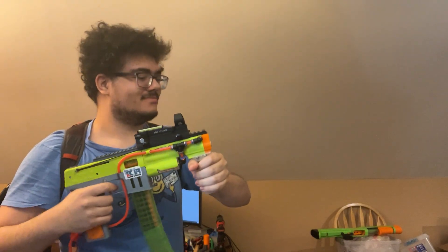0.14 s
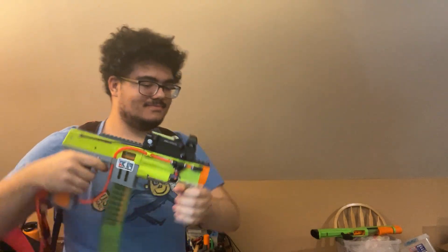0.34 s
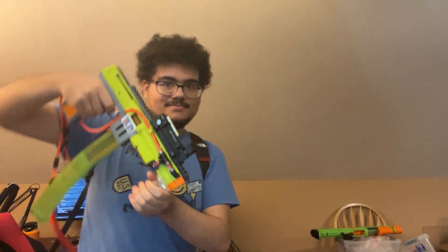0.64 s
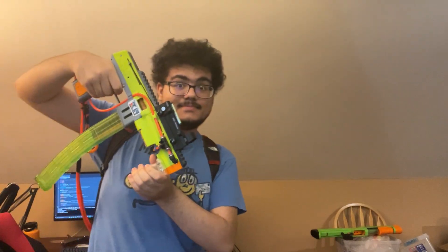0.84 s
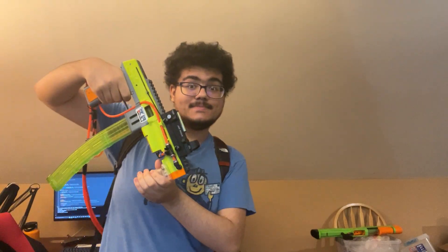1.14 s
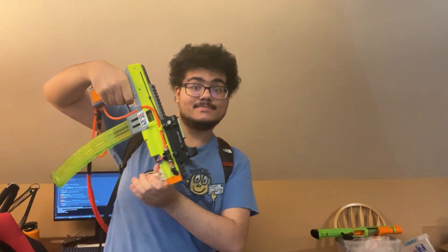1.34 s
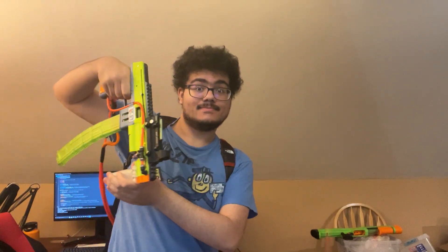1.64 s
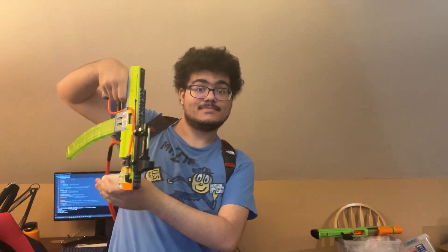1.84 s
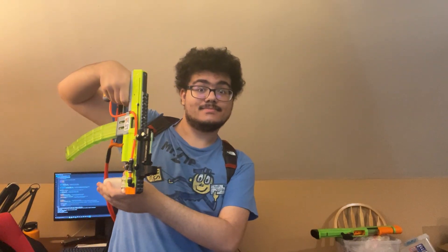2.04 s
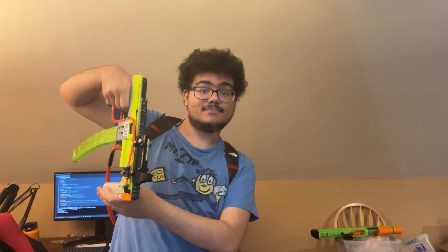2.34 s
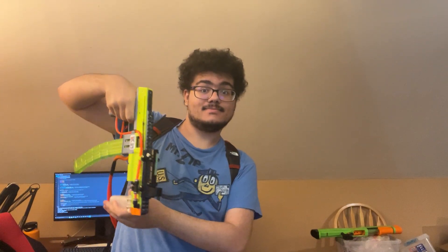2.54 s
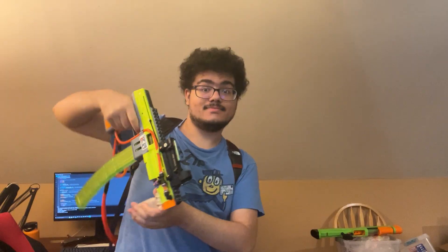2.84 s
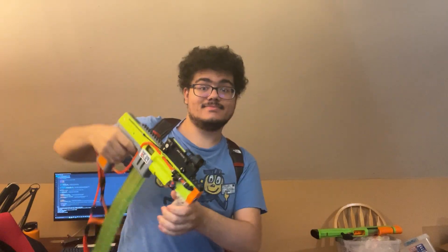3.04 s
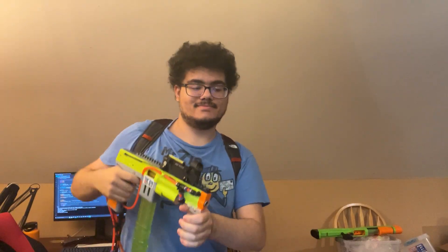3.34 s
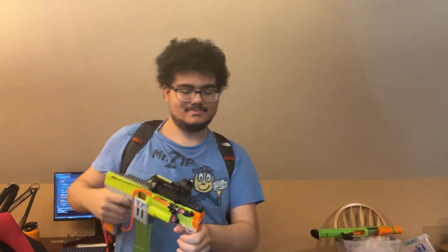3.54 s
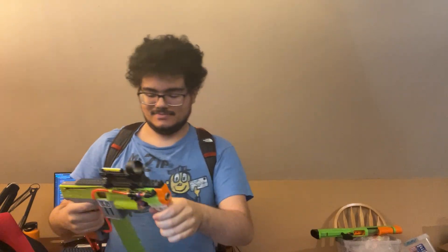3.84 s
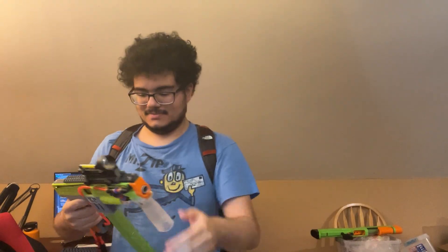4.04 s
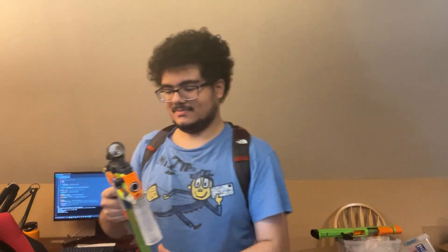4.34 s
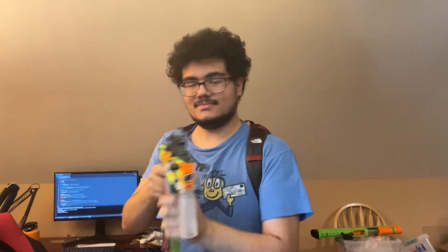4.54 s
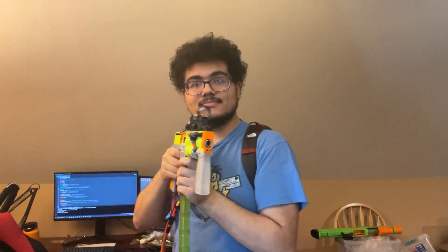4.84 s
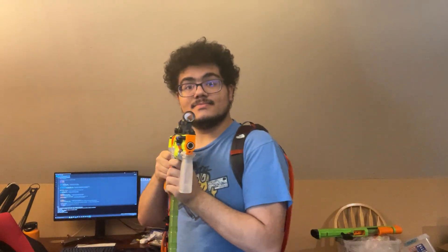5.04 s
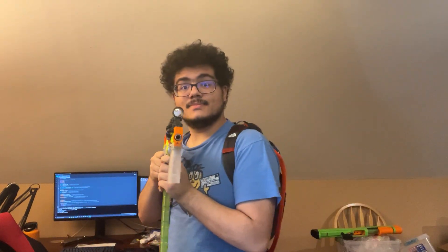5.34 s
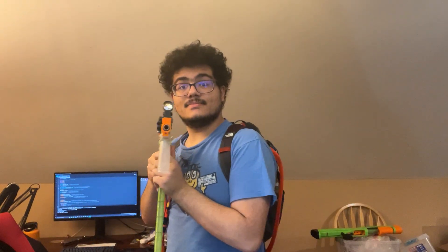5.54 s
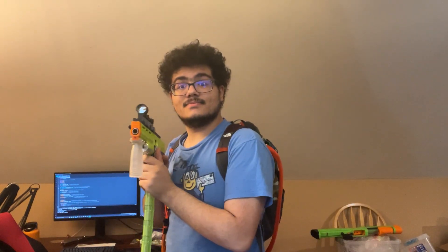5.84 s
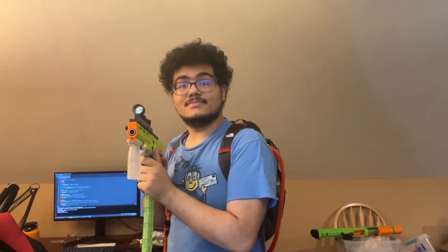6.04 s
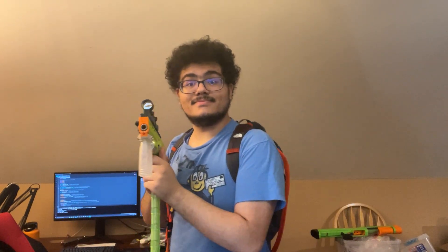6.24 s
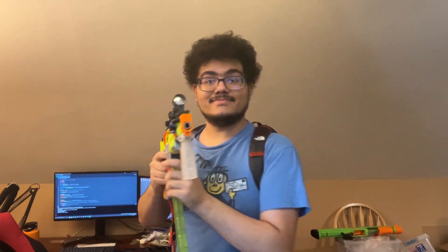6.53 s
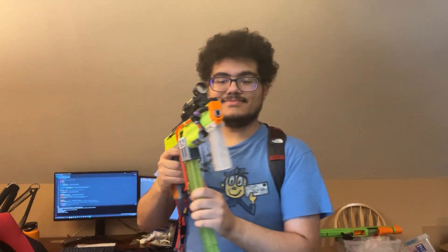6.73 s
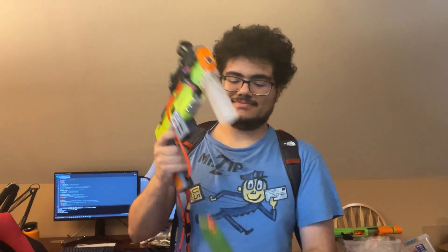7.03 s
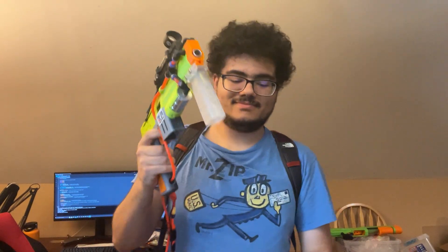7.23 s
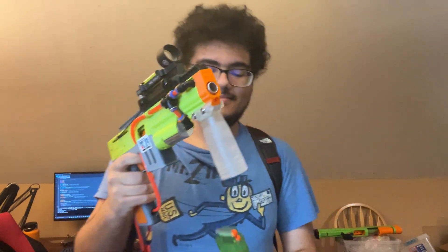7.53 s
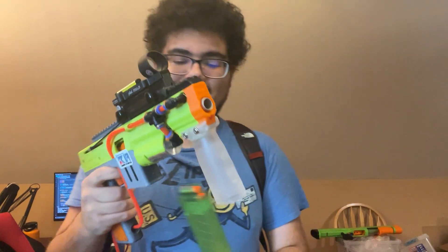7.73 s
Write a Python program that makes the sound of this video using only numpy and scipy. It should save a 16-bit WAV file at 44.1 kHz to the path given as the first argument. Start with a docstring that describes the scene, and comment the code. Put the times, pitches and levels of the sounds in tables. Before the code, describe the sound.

Indoors, a compressed-air dart blaster pops four times a second in two bursts, darts smacking objects, followed by a magazine scraping and clicking free.

```python
"""A compressed-air dart blaster fires bursts of ten and six, four shots a second: side-on, then facing the microphone.
Each shot is a bolt kick, an air jet, a pop with barrel ring and boom; then venting, bolt snap, valve knock and air feed.
Darts strike things as shaped noise and pulses; one struck object rings on as dying sines over a noise wash.
Around the bursts the plastic shell is handled: knocks, creaks, rattle, cloth rustle and a sliding magazine.
All of it passes through a small room with near echoes, over a faint hum and a rush of noise."""
import sys
import numpy as np
from scipy import signal
from scipy.fft import rfft, irfft, next_fast_len
from scipy.io import wavfile
from scipy.ndimage import uniform_filter1d

SR = 44100
rng = np.random.default_rng(int(sys.argv[2]) if len(sys.argv) > 2 else 0)


def store_pcm(level_fs):
    """Save levels as 16-bit WAV."""
    pcm = np.round(np.clip(level_fs, -1, 1) * 32767).astype(np.int16)
    wavfile.write(sys.argv[1], SR, np.atleast_2d(pcm).T)


N = 347508


def amp(db):
    """Decibels to linear amplitude."""
    return 10 ** (np.asarray(db) / 20)


def evened(x):
    """Scale to unit RMS."""
    return x / np.sqrt(np.mean(x ** 2) + 1e-20)


def seconds(length_s):
    """Time axis in seconds."""
    return np.arange(int(length_s * SR)) / SR


def read(table, hz, index=1):
    """Interpolate one table column along a log-frequency axis."""
    columns = np.transpose(table)
    return np.interp(np.log(hz + 1), np.log(columns[0] + 1), columns[index])


def level_at(table, time_s):
    """Interpolate a (time, level) table in dB."""
    return np.interp(time_s, *np.transpose(table))


def add(mix, start_s, sound):
    """Mix a sound in at a start time, cut at the end of the mix."""
    part = mix[max(round(start_s * SR), 0):][:len(sound)]
    part += sound[:len(part)]


def slow_noise(shape, width):
    """Unit-RMS noise smoothed twice into a slow wander."""
    once = uniform_filter1d(rng.standard_normal(shape), size=width)
    return evened(uniform_filter1d(once, size=width))


def click(table, index=1, dull_hz=1e6, size=4096):
    """Minimum-phase pulse of unit energy with the given colour, rolled off above dull_hz."""
    hz = abs(np.fft.fftfreq(size, 1 / SR))
    gain = amp(read(table, hz, index)) / np.sqrt(1 + (hz / dull_hz) ** 6)
    spectrum = np.exp(signal.hilbert(np.log(gain + 1e-5)).conj())
    pulse = np.fft.ifft(spectrum).real[:size // 2]
    return pulse / np.linalg.norm(pulse)


def push(pulse):
    """Single pressure pulse with the energy of 2 ms at full level."""
    return pulse * np.sqrt(.002 * SR)


def puff(pulse, rise_s, hold_s, fall_s):
    """Turbulent air: noise that swells, holds and dies, coloured by a pulse."""
    t = seconds(rise_s + hold_s + 10 * fall_s)
    shape = np.minimum(t / rise_s, 1) * np.exp(-np.maximum(t - rise_s - hold_s, 0) / fall_s)
    return signal.fftconvolve(shape * rng.standard_normal(len(t)), pulse)


def ring(modes, length_s, rise_s):
    """Resonant modes: exponentially dying sines under a shared onset."""
    t = seconds(length_s)
    sines = sum(amp(db - 60 * t / t60_s) * np.sin(2 * np.pi * hz * t) for hz, db, t60_s in modes)
    return sines * (1 - np.exp(-t / rise_s))


def scattered(start_s, end_s, per_s):
    """One random moment in each equal slot between two times."""
    slots = np.arange(start_s, end_s, 1 / per_s)
    return slots + rng.random(len(slots)) / per_s


# rush of the room: (frequency [Hz], level [dB])
FLOOR_COLOUR = [(20, -8.5), (60, 2.5), (130, -1), (250, -7), (600, -12.5), (1500, -22), (5000, -28),
                (16000, -29)]
HUM_HZ = 119.3


def background(hum_db=-72.5, floor_db=-76, waver_db=5.5):
    """A hum wavering in level and phase over coloured, partly shared stereo noise."""
    waver = slow_noise((2, N), 3000)
    turns = HUM_HZ * np.arange(N) / SR + .06 * waver[1]
    hum = amp(hum_db + waver_db * waver[0]) * np.sqrt(2) * np.sin(2 * np.pi * turns)
    air = signal.fftconvolve(rng.standard_normal((2, N)), click(FLOOR_COLOUR)[None], axes=1)[:, :N]
    return hum + amp(floor_db) * evened(air + .5 * air[::-1])


# sleeves and straps as the blaster moves: (time [s], level [dB])
RUSTLE_LEVEL = [(0, -67.5), (.3, -63), (.7, -67), (3.5, -63), (4.3, -71.5), (4.55, -70), (6.7, -81),
                (7.25, -91.5), (7.88, -91.5)]
# cloth friction: (frequency [Hz], level [dB])
CLOTH_COLOUR = [(40, -11.5), (150, 4), (480, 3), (700, -5.5), (1100, -14.5), (2500, -20), (16000, -26)]


def rustle(uneven_db=1.5):
    """Cloth friction: coloured noise with an uneven level."""
    level_db = level_at(RUSTLE_LEVEL, np.arange(N) / SR) + uneven_db * slow_noise(N, 1200)
    return signal.fftconvolve(amp(level_db) * rng.standard_normal(N), click(CLOTH_COLOUR))[:N]


# blaster swung round: (start [s], end [s], level [dB])
SWINGS = [(.52, .66, -61), (4.6, 4.98, -53.5)]
# air jet, also colours the ticks: (frequency [Hz], side-on level [dB], facing level [dB])
JET_COLOUR = [(100, -19.5, -24), (600, -8, 0.5), (2000, -2, 1.5), (4000, -2, -0.5), (7000, 0.5, 2),
              (11090, -4, -1), (16250, -5.5, -3.5)]
TICKS_PER_S = 30


def rattle(spread_db=3.0, fall_s=.0012):
    """Loose darts tick in the magazine: short noise bursts at scattered moments and levels."""
    out = np.zeros(N)
    for start_s, end_s, db in SWINGS:
        for tick_s in scattered(start_s, end_s, TICKS_PER_S):
            gain = amp(db + spread_db * rng.standard_normal())
            add(out, tick_s, gain * puff(click(JET_COLOUR), .0004, .00054, fall_s))
    return out


# plastic shell: (frequency [Hz], level [dB])
SHELL_COLOUR = [(80, -38), (300, -7.5), (650, -6), (1000, 7.5), (1300, -3), (1550, -1.5), (1850, -3),
                (2800, -7), (6000, 0), (10000, 0), (16000, -7.5)]
# hollow shell resonances: (frequency [Hz], level [dB], t60 [s])
SHELL_MODES = [(960, -1, 0.12), (1033, -4, 0.15), (1256, -6, .13), (1870, -6, 0.074), (2135, -7.5, .1)]


def touch(db, dull_hz, fall_s, ring_db=-12):
    """One contact with the hollow shell: noise plus modes; longer contact rings more."""
    out = np.zeros(SR)
    add(out, 0, amp(db) * puff(click(SHELL_COLOUR, dull_hz=dull_hz), .00093, .0006, fall_s))
    add(out, 0, amp(db + ring_db) * np.sqrt(fall_s / .01) * ring(SHELL_MODES, .25, .0024))
    return out


# hand knocks and scuffs: (time [s], level [dB], dullness [Hz], fall time [s], ring level [dB])
HAND_CONTACTS = [(.003, -44.5, 9400, 0.019, -14), (.282, -56, 3030, .04, -14), (.381, -59.5, 600, .03, -30),
                 (.594, -52, 14000, .004, -30), (.715, -51, 14000, .003, -30),
                 (3.548, -49, 14000, .0055, -18), (3.742, -57.5, 3000, 0.021, -14),
                 (3.96, -63, 5000, .013, -20), (4.123, -63, 2500, .02, -12),
                 (4.452, -43.5, 3000, .0096, -8), (4.797, -49, 5000, 0.017, -11),
                 (6.765, -56.5, 5000, 0.0091, -9), (7.30, -69, 15000, 0.037, -24),
                 (7.829, -38, 3800, .025, -9)]
# grip shifts: (start [s], end [s], level [dB])
GRIPS = [(0.151, .36, -65), (4.42, 4.66, -58), (7.602, 7.76, -82)]
CREAKS_PER_S, CREAK_DULL_HZ, CREAK_FALL_S = 30, 2600, .011


def handling(spread_db=3.5, creak_ring_db=-8):
    """Hands knock and scuff the shell; runs of faint creaks as the grip shifts."""
    out = np.zeros(N)
    for contact_s, *contact in HAND_CONTACTS:
        add(out, contact_s, touch(*contact))
    for start_s, end_s, db in GRIPS:
        for creak_s in scattered(start_s, end_s, CREAKS_PER_S):
            creak_db = db + spread_db * rng.standard_normal()
            add(out, creak_s, touch(creak_db, CREAK_DULL_HZ, CREAK_FALL_S, creak_ring_db))
    return out


CATCH_S, CATCH_DB = 6.928, -27
SLIDE_S, SLIDE_DB, SLIDE_SWELL_DB, SLIDE_ON_S, SLIDE_FALL_S = .08, -40.5, 26.5, .021, .025


def magazine(dull_hz=12000, catch_dull_hz=15000, catch_fall_s=.003):
    """The magazine scrapes along its well, louder and louder, clicks past the catch and slides free."""
    out, t = np.zeros(N), seconds(.4) - SLIDE_S  # t = 0 at the catch
    swell = amp(SLIDE_DB + SLIDE_SWELL_DB * np.minimum(t / SLIDE_S, 0))
    swell = swell * np.exp(-np.maximum(t - SLIDE_ON_S, 0) / SLIDE_FALL_S)
    scrape = signal.fftconvolve(swell * rng.standard_normal(len(t)), click(SHELL_COLOUR, dull_hz=dull_hz))
    add(out, CATCH_S - SLIDE_S, scrape)
    add(out, CATCH_S, touch(CATCH_DB, catch_dull_hz, catch_fall_s))
    return out


# struck things: (frequency [Hz], level [dB])
TARGET_COLOUR = [(50, -19), (200, -10), (450, -4), (700, 0), (1100, -0.5), (2500, -2), (16000, -5)]
# hard hits: (time [s], level [dB], dullness [Hz], fall time [s])
DART_HITS = [(1.531, -14, 3300, 0.0024), (1.547, -22, 3286, 0.01), (1.783, -20, 2500, .005),
             (2.03, -17, 3800, .002), (2.530, -18.5, 7000, .0024), (2.780, -16.5, 6160, .0077),
             (3.024, -18.5, 1823, 0.0065), (5.205, -17.5, 3500, 0.0042)]
# soft bumps of darts and hands: (time [s], level [dB], frequency [Hz])
SOFT_BUMPS = [(1.813, -29.5, 217), (2.361, -29.5, 170), (2.859, -27.5, 165), (3.343, -17.5, 444),
              (3.745, -39, 400), (3.76, -39.5, 165), (6.897, -32, 778)]
BUMP_CYCLES = 10  # swings per t60
# blows on the ringing object: (time [s], level [dB])
RING_BLOWS = [(2.53, -42), (2.78, -46.5), (3.025, -29.3)]
# its modes: (frequency [Hz], level [dB], t60 [s])
RING_MODES = [(165, -21, 2.6), (400, -13, 0.87), (465, -4.5, 0.64), (646, -8.5, 0.5), (678, -4.5, 1.23),
              (722, -8, 1), (850, -11, 1.42), (867, -10, 0.51), (985, -9, 0.35), (1238, -9, 1),
              (1344, -11.5, 0.89), (1390, -0.5, 0.5), (1470, -4, 0.43), (1560, -9.5, 0.17),
              (1960, -7, 0.56)]
# its dense, blurred ring: (frequency [Hz], level [dB])
RING_WASH_COLOUR = [(80, -14), (170, -8.5), (270, -8), (450, -1.5), (750, -2.5), (1300, -8), (1900, -15.5),
                    (3000, -23.5), (16000, -58)]


def darts(scatter_db=-1.0, thud_db=-16):
    """Hard slaps are pulse plus noise, soft bumps one short mode plus a thud; one object rings on."""
    out = np.zeros(N)
    for hit_s, db, dull_hz, fall_s in DART_HITS:
        slap = click(TARGET_COLOUR, dull_hz=dull_hz)
        add(out, hit_s + .001, amp(db) * push(slap))
        add(out, hit_s, amp(db + scatter_db) * puff(slap, .0005, .00054, fall_s))
    for bump_s, db, hz in SOFT_BUMPS:
        add(out, bump_s, ring([(hz, db, BUMP_CYCLES / hz)], .3, .0023))
        thud = puff(click(TARGET_COLOUR, dull_hz=2 * hz), .002, .002, .008)
        add(out, bump_s, amp(db + thud_db) * thud)
    for blow_s, db in RING_BLOWS:
        add(out, blow_s, amp(db) * ring(RING_MODES, 1.8, .004))
        add(out, blow_s, amp(db) * puff(click(RING_WASH_COLOUR), .0021, .0033, .17))
    return out


# bright rasp: (frequency [Hz], level [dB])
RASP_COLOUR = [(200, -10.5), (1500, -11.5), (2430, -3.5), (2800, -9.5), (3250, 3.5), (4200, -11.5),
               (8000, -16.5), (16000, -34)]
RASP_S, RASP_DB = 5.087, -23
# bounces on something hollow: (time [s], level [dB])
HOLLOW_BLOWS = [(5.132, -13), (5.145, -16), (5.164, -20)]
# its modes: (frequency [Hz], level [dB], t60 [s])
HOLLOW_MODES = [(566, -1, 0.088), (930, -1, .05), (1056, -3.5, 0.065)]


def ricochet(dull_hz=1000, ring_db=-4):
    """A stray dart grazes something with a noise rasp, then bounces on something hollow that rings."""
    out = np.zeros(N)
    add(out, RASP_S, amp(RASP_DB) * puff(click(RASP_COLOUR), .0035, .0068, .008))
    for blow_s, db in HOLLOW_BLOWS:
        add(out, blow_s, amp(db) * puff(click(TARGET_COLOUR, dull_hz=dull_hz), .0007, .00066, .01))
        add(out, blow_s, amp(db + ring_db) * ring(HOLLOW_MODES, .2, .0011))
    return out


# every pair from here on is (side-on, facing)
CYCLE_S, BURST_SHOTS = .25, (10, 6)
BURST_START_S = (.7416, 5.0107)  # first pop


def cycles():
    """Time of every pop, with the pose: 0 side-on, 1 facing the microphone."""
    return [(BURST_START_S[pose] + k * CYCLE_S, pose)
            for pose, count in enumerate(BURST_SHOTS) for k in range(count)]


# bolt snap and venting: (frequency [Hz], side-on level [dB], facing level [dB])
SNAP_COLOUR = [(100, -22.5, -16), (400, -9.5, 7.5), (900, -5, -8), (2000, -2, -2), (3800, 1, 1.5),
               (7000, 0, 5), (11000, -3, -1.5), (16000, -6, 0)]
# bolt hangs, then snaps home late: (time [s], snap level [dB])
HANGS = [(0.9036, -13), (1.0816, -13), (1.5792, -17), (2.0461, -13), (2.561, -15.5), (2.7941, -14),
         (3.0453, -11), (5.1913, -11)]
RETURN_S = (.0452, .0266)  # pop to snap of a free bolt
SNAP_DB, VENT_DB, HUNG_VENT_DB = (-13, -14.5), (-24, -32), -23


def returns(vent_lead_s=.022):
    """Spent air vents as noise until the bolt snaps home; a hung bolt vents harder and snaps late."""
    out = np.zeros(N)
    for pop_s, pose in cycles():
        snap_s, snap_db, vent_db = pop_s + RETURN_S[pose], SNAP_DB[pose], VENT_DB[pose]
        late = [hang for hang in HANGS if pop_s < hang[0] < pop_s + CYCLE_S]
        if late:
            (snap_s, snap_db), vent_db = late[0], HUNG_VENT_DB
        snap = click(SNAP_COLOUR, index=1 + pose)
        add(out, snap_s - vent_lead_s, amp(vent_db) * puff(snap, .0036, .026, .0033))
        add(out, snap_s, amp(snap_db) * puff(snap, .0012, .003, .0017))
    return out


# valve knock: (frequency [Hz], side-on level [dB], facing level [dB])
KNOCK_COLOUR = [(60, -35.5, -31.5), (200, -22, -15.5), (370, -9.5, -4.5), (470, -16.5, 2), (600, -11.5, 0),
                (850, 3, -11.5), (1180, -18, 1), (1750, -0.5, -5), (2100, -12.5, -0.5), (2500, -3.5, 6.5),
                (3500, -9, 2), (5000, -10.5, -12), (16000, -14.5, -28)]
# air feed: (frequency [Hz], side-on level [dB], facing level [dB])
FEED_COLOUR = [(100, -27.5, -24.5), (300.4, -13, -10), (700, -1.5, -6), (1300, -7, -1.5), (2500, -3.5, -7),
               (3980, -2, -2.5), (7000, 1.5, 0), (9790, -3.5, -4), (15500, -4, -14.5)]
# feed envelope, one row per pose: (rise [s], hold [s], fall [s])
FEED_SHAPE = [(.002, 0.023, 0.0026), (0.017, .003, .003)]
# knock, softer as the blaster is tipped away: (time [s], level [dB])
KNOCK_LEVEL = [(.93, -11), (1.43, -11.5), (2.1, -17), (3.18, -15), (5.2, -21.5), (6.45, -18)]
# valve body: (frequency [Hz], level [dB], t60 [s])
VALVE_MODES = [(880, 1, 0.021), (1730, -2.5, .035), (2500, -2, 0.029), (3500, -3.5, .028)]
VALVE_S, FEED_DB = (.191, .1905), (-22, -22.5)  # pop to valve opening
SEATED_S, SEATED_DB = (.0205, .016), (-23, -24)  # knock to bolt stop


def valve(push_db=(-4.5, -4), ring_db=(-8, -16), clack_db=(-5, -7.5), seat_db=(-38, -40),
          seat_lead_s=(.005, .007)):
    """The valve knocks on the shell and rings, air hisses into the chamber, the bolt reaches its stop."""
    out = np.zeros(N)
    for pop_s, pose in cycles():
        open_s = pop_s + VALVE_S[pose]
        knock = amp(level_at(KNOCK_LEVEL, open_s))
        feed = click(FEED_COLOUR, index=1 + pose)
        thud = push(click(KNOCK_COLOUR, index=1 + pose, dull_hz=1410))
        clack = puff(click(KNOCK_COLOUR, index=1 + pose), .0018, .0015, .0022)
        stop = puff(click(SNAP_COLOUR), .001, .001, .0015)
        add(out, open_s + .00083, knock * amp(push_db[pose]) * thud)
        add(out, open_s, knock * amp(ring_db[pose]) * ring(VALVE_MODES, .1, .0014))
        add(out, open_s, knock * amp(clack_db[pose]) * clack)
        # the seat cracks open
        add(out, open_s - seat_lead_s[pose], amp(seat_db[pose]) * puff(feed, .002, .003, .002))
        add(out, open_s + .0005, amp(FEED_DB[pose]) * puff(feed, *FEED_SHAPE[pose]))
        add(out, open_s + SEATED_S[pose], amp(SEATED_DB[pose]) * stop)
    return out


# muzzle pop: (frequency [Hz], side-on level [dB], facing level [dB])
POP_COLOUR = [(30, -38.5, -38), (69.5, -21.5, -12), (140, -6, 0), (202, -10.5, 4.5), (305, 4.5, 7),
              (400, -1.5, 6), (600, -3, 0), (950, 1.5, -6.5), (1500, -7, -6), (2500, -3.5, -9.5),
              (4020, -8.5, -15.5), (7960, -9.5, -19.5), (16000, -27, -39)]
# air swinging in the barrel once the dart is out: (frequency [Hz], level [dB], t60 [s])
BARREL_MODES = [(696, -4, 0.0078), (983, -1, 0.012), (1350, -4, 0.0074)]
# low ring of barrel and room: (mean frequency [Hz], t60 [s], side-on level [dB], facing level [dB])
BOOM_MODES = [(135, 0.13, -11.5, -16.5), (216.8, 0.087, -17.5, -15), (310, .08, -5.5, -9.5),
              (350, .07, -8, 2.5), (464, 0.054, -11.5, -7), (560.4, 0.075, -11.5, -1)]
TRANSIT_S = (.0057, .0048)  # dart's time in the barrel
KICK_DB, JET_DB, JET_HOLD_S = (-21, -16.5), (-12.5, -10.5), (.0041, .0015)
POP_DB, BLAST_DB, BARREL_DB = (-11.5, -14), (-12.5, -22), (-6, -10.5)
BOOM_DB, THUMP_DB = (-25, -20.5), (-28.5, -21.5)


def shots(thump_hz=75, thump_width_s=.0032, leak_db=-24, detune=.015):
    """The bolt kicks, air jets past the dart, and the barrel pops open, rings and booms."""
    out, t = np.zeros(N), seconds(.03)
    t = t - t.mean()
    thump = np.sin(2 * np.pi * thump_hz * t) * np.exp(-(t / thump_width_s) ** 2)
    for pop_s, pose in cycles():
        pop, jet = click(POP_COLOUR, index=1 + pose), click(JET_COLOUR, index=1 + pose)
        dull_pop = click(POP_COLOUR, index=1 + pose, dull_hz=2530)
        launch_s = pop_s - TRANSIT_S[pose]
        add(out, launch_s - .009, amp(leak_db) * puff(pop, .024, .004, .0025))  # the seal leaks first
        add(out, launch_s, amp(KICK_DB[pose]) * push(click(POP_COLOUR, dull_hz=1600)))
        add(out, launch_s, amp(JET_DB[pose]) * puff(jet, .006, JET_HOLD_S[pose], .0014))
        add(out, pop_s + .0012, amp(POP_DB[pose]) * push(dull_pop))
        add(out, pop_s, amp(BLAST_DB[pose]) * puff(pop, .00097, .0018, .0026))
        add(out, pop_s + .0008, amp(BARREL_DB[pose]) * ring(BARREL_MODES, .04, .0013))
        boom = [(hz * (1 + detune * rng.standard_normal()), levels_db[pose], t60_s)
                for hz, t60_s, *levels_db in BOOM_MODES]
        add(out, pop_s + .0023, amp(BOOM_DB[pose]) * ring(boom, .4, .0033))
        add(out, pop_s - .001, amp(THUMP_DB[pose]) * thump)  # low thump arriving just after the pop
    return out


# reverberation: (frequency [Hz], level [dB], t60 [s], left-right likeness [-1..1])
ROOM_BANDS = [(60, -9, 0.15, .93), (200, 0, 0.33, 0.94), (450, 0.5, 0.23, 0.073), (1000, -2, .32, .0),
              (2500, 0, 0.33, .0), (5900, -4, 0.32, 0), (7500, -3.5, .3, 0.99), (8500, -2.5, .29, 1),
              (11300, -4.5, .27, 0.92), (13500, -6.5, .25, 1), (16000, -9.5, .23, .9)]
# near surfaces: (mean delay to left [s], mean delay to right [s], level [dB])
ECHOES = [(.0011, 0.0013, -14), (.0029, 0.0023, -11.5), (.0044, 0.0025, -22.5), (0.014, .0146, -8.5),
          (0.0157, .0163, -10)]


def room(x, build_s=.0058, count=6):
    """Direct sound, near echoes and a tail dying band by band; the response steps every 0.25 s."""
    hz, t, z = signal.stft(rng.standard_normal((2, count, int(.6 * SR))), SR, nperseg=256)
    wet_db, t60_s, same = (read(ROOM_BANDS, hz, index=k)[:, None] for k in range(1, 4))
    same = np.clip(same, -1, 1)
    z = np.array([z[0], same * z[0] + np.sqrt(1 - same ** 2) * z[1]])
    z = z * amp(wet_db - 60 * t / t60_s) * np.sqrt(2 * np.log(1000) / (t60_s * SR))
    responses = signal.istft(z, SR, nperseg=256)[1]
    responses *= 1 - np.exp(-(np.arange(responses.shape[-1]) / SR / build_s) ** 2)
    responses[..., 0] += 1  # direct sound
    bounce = signal.lfilter([.35], [1, -.65], signal.unit_impulse(32))  # cloth and furniture soften it
    stance = np.floor((np.arange(N) / SR + .1) * 4) % count
    out = np.zeros((2, N))
    for k in range(count):
        for left_s, right_s, db in ECHOES:
            sway_s = rng.uniform(-.0002, .0002)
            add(responses[0, k], left_s + sway_s, amp(db) * bounce)
            add(responses[1, k], right_s + sway_s, amp(db) * bounce)
        share = uniform_filter1d(1. * (stance == k), size=256)  # short crossfade
        out += signal.oaconvolve((x * share)[None], responses[:, k], axes=1)[:, :N]
    return out


def scene(low_cut_hz=42):
    """All sources in one room over the background, high-passed."""
    dry = rustle() + rattle() + handling() + magazine() + darts() + ricochet() + returns() + valve() + shots()
    low_cut = signal.butter(2, low_cut_hz, "high", fs=SR, output="sos")
    return signal.sosfilt(low_cut, room(dry) + background())


# left gain, inverted on the right: (frequency [Hz], level [dB])
PORT_LEAN = [(50, .1), (140, .9), (300, .7), (700, .1), (3000, -.3), (9000, .1)]
# right port behind left: (frequency [Hz], phase lag [rad])
PORT_LAG = [(50, 0), (2300, .1), (3100, -1.2), (4000, 0), (5000, 1), (5800, 2.4), (6500, 1.1), (7500, 2),
            (8400, 3.14), (10300, 5.8), (11000, 6.4), (12300, 8.3), (13600, 9.42), (15800, 12.3)]
EDGE_HZ = 16000


def record(dry):
    """Two ports with a phase lag and a bass tilt between them, soft overload, and the band limit."""
    size = next_fast_len(N + 4096)
    hz = np.fft.rfftfreq(size, 1 / SR)
    lean = amp(read(PORT_LEAN, hz))
    ports = np.array([lean, np.exp(-1j * read(PORT_LAG, hz)) / lean])
    x = irfft(rfft(dry, size) * ports, size)[:, :N]
    x = x / (1 + (x / .93) ** 6) ** (1 / 6)
    band_limit = signal.firwin(255, EDGE_HZ, window=("kaiser", 8), fs=SR)
    return signal.oaconvolve(x, band_limit[None], "same")


dry = scene()
out = record(dry)
store_pcm(out)
```